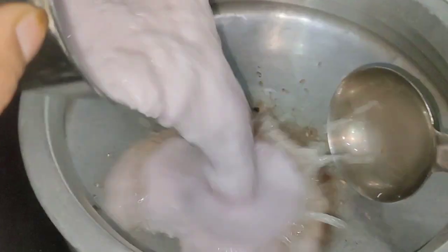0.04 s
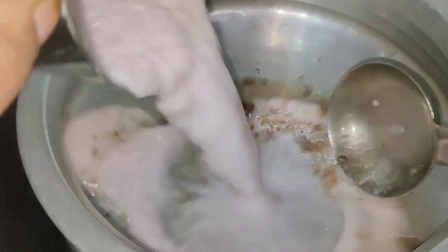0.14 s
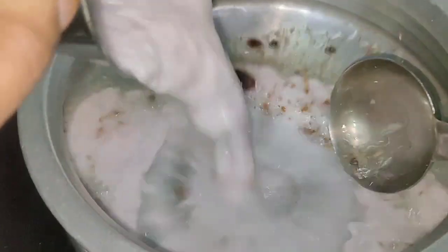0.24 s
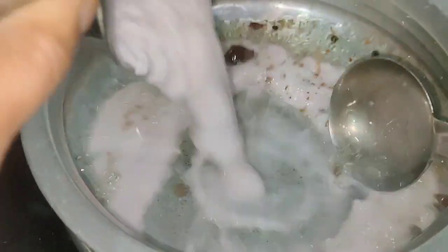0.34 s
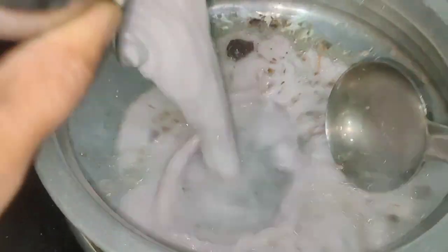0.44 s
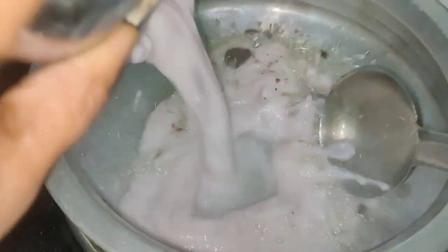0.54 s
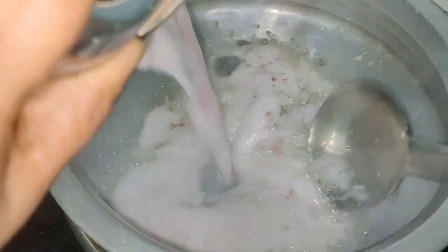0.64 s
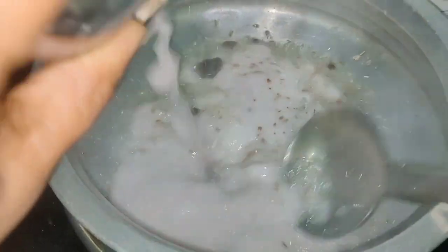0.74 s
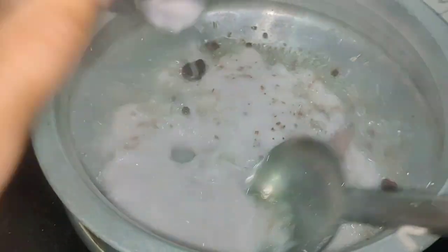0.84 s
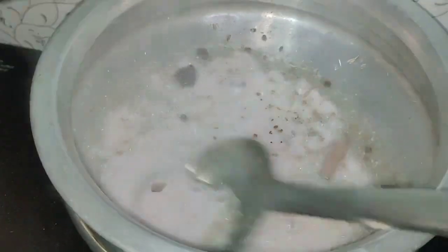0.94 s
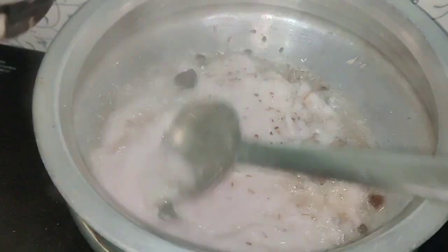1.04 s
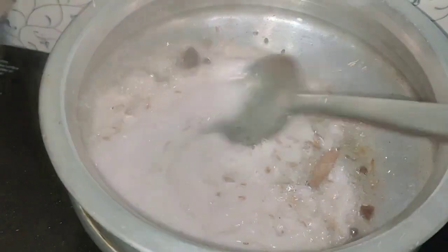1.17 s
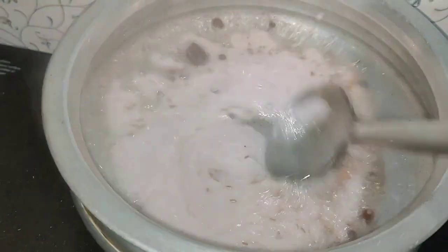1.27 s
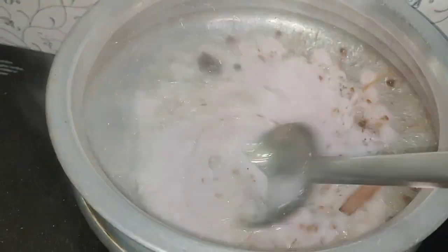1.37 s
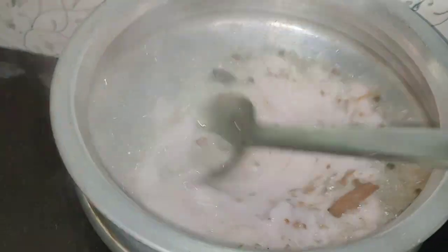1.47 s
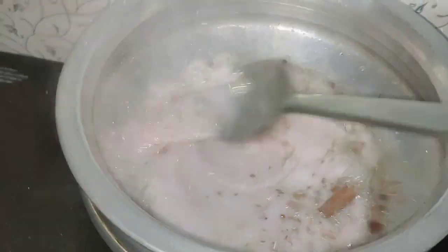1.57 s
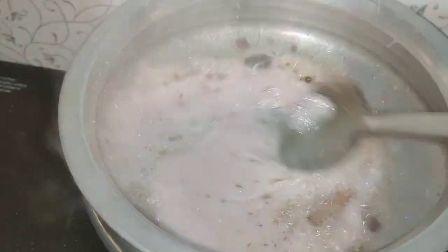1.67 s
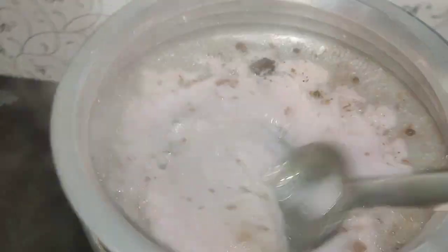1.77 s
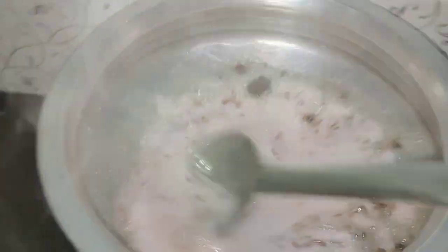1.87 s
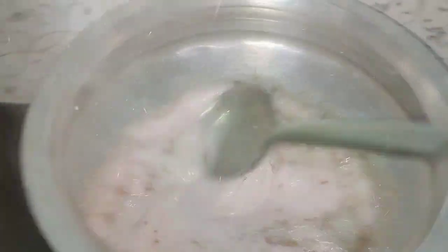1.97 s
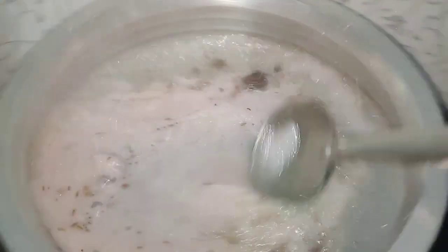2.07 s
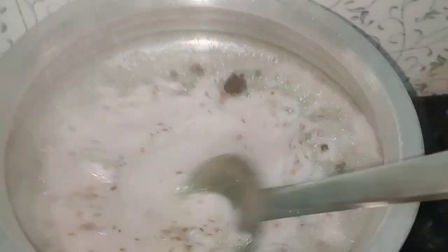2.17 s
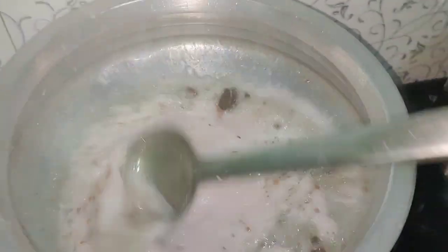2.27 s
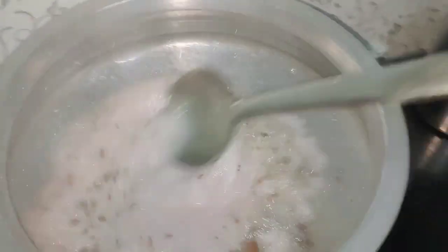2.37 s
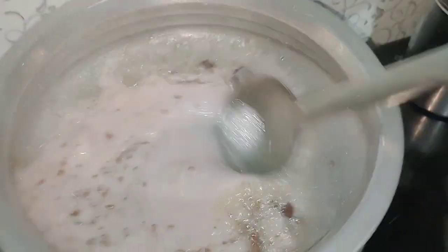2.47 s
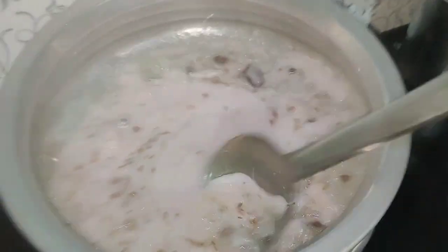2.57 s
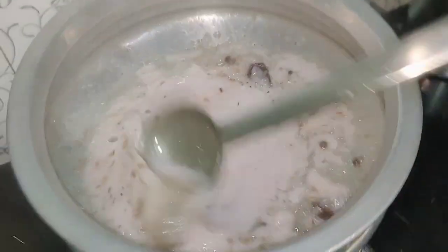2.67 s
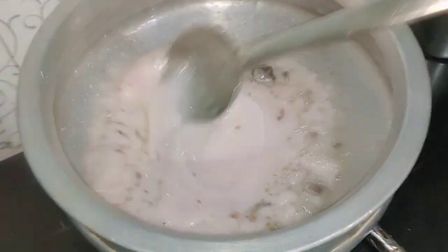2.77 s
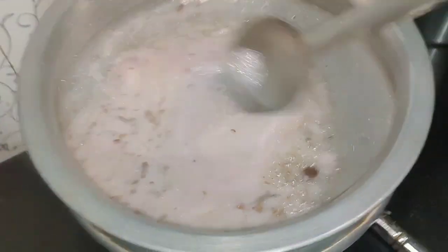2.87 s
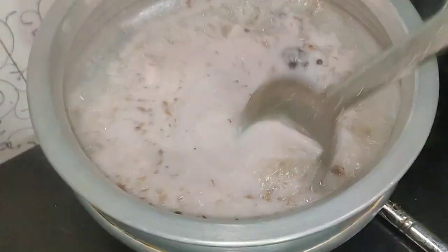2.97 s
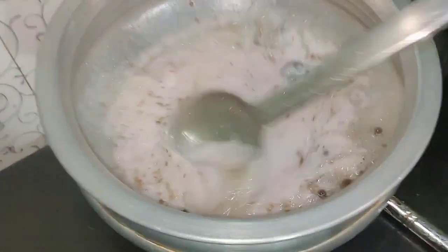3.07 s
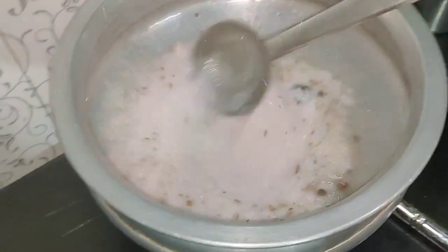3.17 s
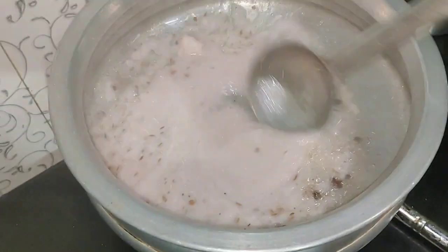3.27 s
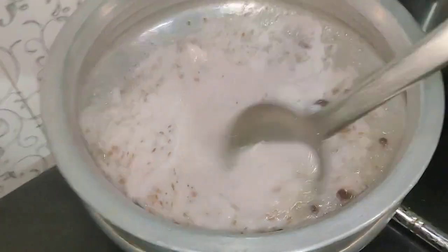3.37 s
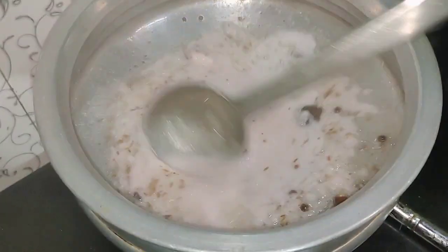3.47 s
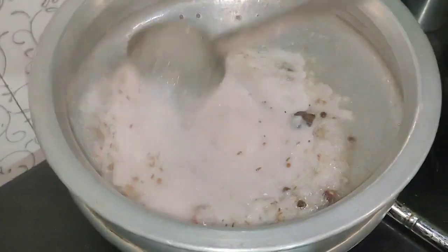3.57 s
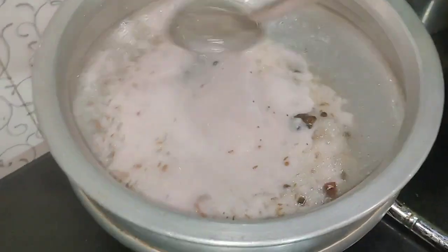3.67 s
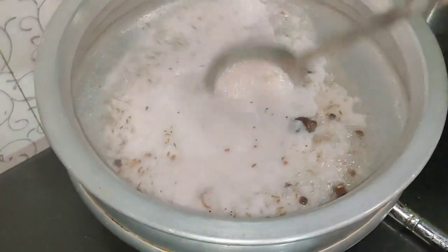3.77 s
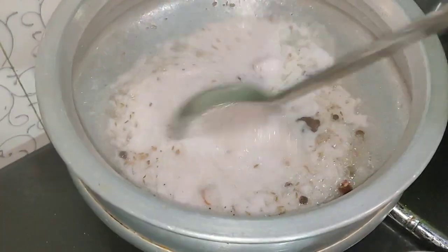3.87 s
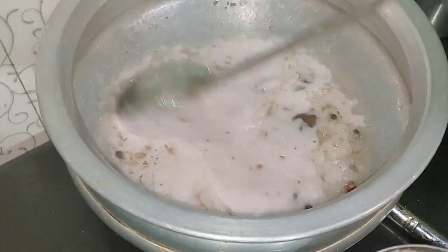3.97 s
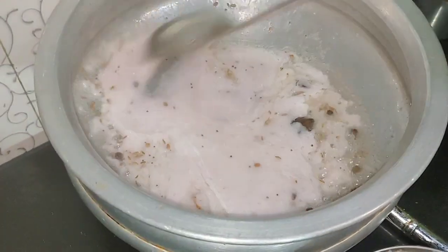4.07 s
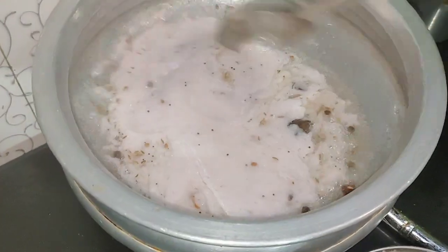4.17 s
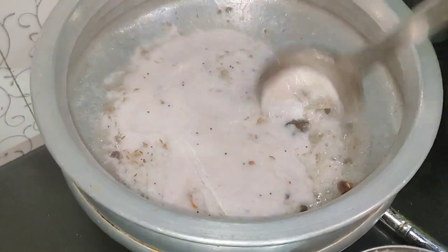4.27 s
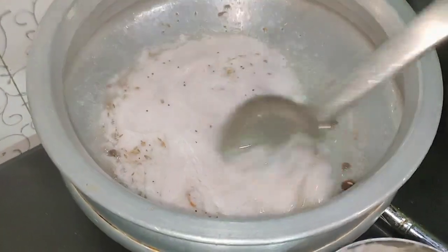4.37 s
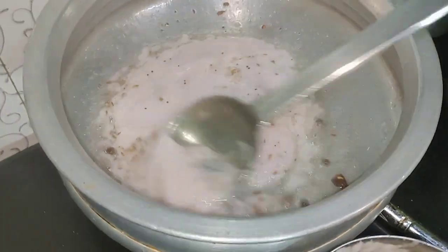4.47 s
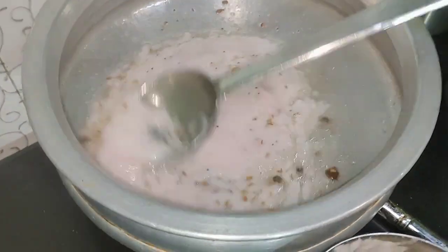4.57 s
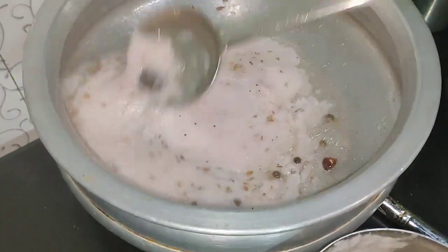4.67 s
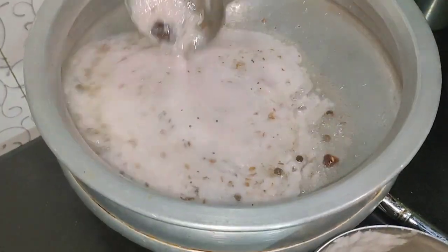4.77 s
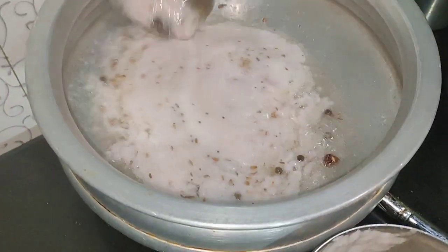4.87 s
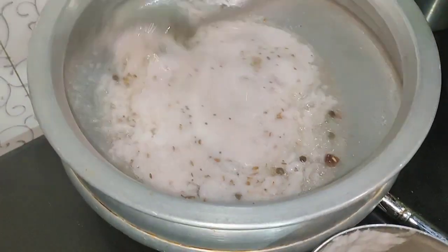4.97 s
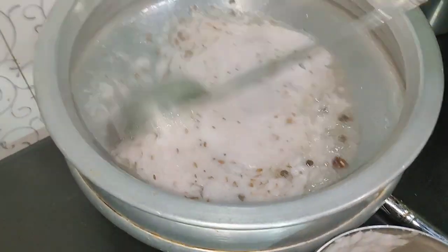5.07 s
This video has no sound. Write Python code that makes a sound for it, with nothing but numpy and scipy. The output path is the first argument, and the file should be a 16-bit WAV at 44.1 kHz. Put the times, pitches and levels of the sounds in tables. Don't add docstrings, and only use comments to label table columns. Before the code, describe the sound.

Close above a metal pot on a gas flame: a brief near-quiet with low flutter, a tiny metallic crack, two dull thuds and a sudden dense frying hiss. Sharp steam spits crowd the first two seconds, with hollow pot resonance beneath. Stirring brings uneven swells, then the sizzle thins, leaving late pops and faint knocks. Indoor phone sound, wide and slightly overloaded at its loudest.

```python
import sys
import numpy as np
from scipy import signal
from scipy.fft import rfft, irfft, next_fast_len
from scipy.io import wavfile

SR = 44100
rng = np.random.default_rng(int(sys.argv[2]) if len(sys.argv) > 2 else 0)


def wrap_up_sound(samples):
    columns = np.atleast_2d(samples).T
    tamed = np.clip(columns, -1, 1)
    steps = np.round(tamed * 32767).astype(np.int16)
    wavfile.write(sys.argv[1], SR, steps)


def magnitude_from_level(level_db):
    exponent = np.asarray(level_db, float) / 20
    return 10 ** exponent


N = 225995

# (time [s], level [dB])
BOIL = [(0, -54), (.17, -58), (.275, -49), (.281, -35), (.315, -32.5), (.323, -27.5), (.39, -24.5),
        (.43, -19), (.535, -18.5), (.58, -17.5), (.78, -20.5), (1.49, -19.5), (1.55, -17.5), (2.15, -18.5),
        (2.75, -21), (3.4, -20), (4.3, -27), (5.12, -30.5)]
# (middle [s], half length [s], swell [dB])
STIRS = [(0.705, 0.032, 2.5), (0.985, 0.07, -0.5), (1.27, .1, 1.5), (1.732, 0.15, 0), (2.0, 0.051, 1),
         (2.154, 0.059, 1), (2.487, 0.14, 2.5), (2.723, .08, 0.5), (2.871, 0.058, 2.5), (3.01, 0.043, -0.5),
         (3.117, .08, 0.5), (3.521, 0.38, -3.5), (3.808, 0.081, 2), (4.153, .1, 0), (4.344, 0.074, 1),
         (4.608, 0.21, 3), (4.814, .1, -3), (4.99, 0.13, 2.5)]
# (time [s], level [dB])
SPLASHES = [
    (.19, -39),
    (.279, -47),
    (0.3181, -33.5),
]
# (frequency [Hz], width [Hz], level [dB])
POT_MODES = [(250, 99, -10.5), (452, 13, -13), (559.55, 3.3, -7), (672, 26, -5.5), (703, 35, -3.5),
             (1115, 44, -0.5), (1223.6, 190, 1), (1280, 120, -5.5), (1663, 60, 0)]
# (time [s], peak [dB], pitch [Hz], left minus right [dB])
POPS = [(0.3202, -13, 3800, 5), (0.7097, -3, 3490, 4.5), (1.0348, -10, 3900, 5.5), (1.6341, -5, 4020, 7),
        (2.201, -8, 3420, 6.5), (2.5063, -6, 3920, -1.5), (2.8501, -11, 3600, 7), (4.2812, -18, 3600, 1.5),
        (4.3068, -13, 3680, 8), (4.361, -11.5, 3600, 6.5), (4.6164, -10, 3190, -2), (4.644, -15, 3980, 2),
        (4.67, -13, 3770, 3)]
# (time [s], peak [dB], pitch [Hz])
GULPS = [
    (1.2022, -13, 1700),
    (1.205, -13, 2050),
    (1.2088, -17, 1800),
    (1.213, -21, 2100),
    (1.472, -19, 2100),
    (1.6696, -13, 2100),
]
# (time [s], peak [dB], pitch [Hz], left minus right [dB])
SPITS = [(0.2164, -32.5, 6830, -7), (0.2823, -21, 7450, -10), (0.2927, -29, 6520, -12),
         (0.3224, -17, 6060, -6), (0.5625, -2.5, 6830, -1), (0.6881, -4, 7100, 0), (0.977, -1, 6090, 4.5),
         (1.034, -0.5, 7410, -10), (1.0465, -3, 6320, -1), (1.092, -5.5, 6280, 7), (1.145, -6.5, 6870, -9),
         (1.1594, -6.5, 7130, -9), (1.1806, -12.5, 6980, -13.5), (1.212, -11.5, 6330, -1),
         (1.4873, -7.5, 6700, -10), (1.604, -10, 5950, 4.5), (1.6164, -4, 5880, -7),
         (1.689, -17, 7060, -3.5), (1.7187, -13, 7060, -1), (2.1174, -4.5, 6500, -7),
         (2.1327, -10.5, 6780, 8.5), (5.0014, -18.5, 6700, -1.5)]
# (time [s], peak [dB], pitch [Hz], t60 [s])
BUMPS = [
    (0.38, -23, 215, 0.07),
    (0.402, -22, 129.8, 0.12),
    (0.751, -23.5, 151, 0.11),
    (3.737, -24, 472.5, 0.0534),
    (4.035, -23, 257.7, 0.094),
    (4.383, -39, 234.7, 0.062),
    (4.699, -24.5, 242.3, 0.09),
    (4.722, -27.5, 272.2, 0.0658),
]
# (time [s], peak [dB])
TICKS = [
    (0.1885, -17.5),
    (0.191, -20),
    (0.191, -18),
    (0.1928, -14.5),
]
# (frequency [Hz], level [dB], t60 [s])
TICK_MODES = [(1750, 1, .03), (2234, -9, .05), (2700, -2, .04), (3400, -7, .025), (5700, -11, .02)]
# (start [s], length [s], level [dB], pitch [Hz])
FLARES = [(0.101, 0.055, -41, 97.83), (0.164, 0.082, -38, 95.2), (0.277, 0.055, -44, 94.5),
          (.327, 0.14, -40.5, 103.9), (.511, 0.097, -40, 95.57), (0.836, 0.217, -38.5, 88.9),
          (1.217, .072, -41, 102.6), (1.288, 0.076, -43.5, 100), (1.371, 0.083, -42.5, 89),
          (1.46, 0.164, -38.5, 96.5), (1.638, .114, -37, 92.8), (1.782, 0.173, -40, 90),
          (2.037, .098, -38.5, 97.1), (2.184, 0.05, -43.5, 102.3), (2.257, 0.074, -40, 92.3),
          (2.332, .094, -41, 93.4), (2.503, 0.069, -48, 99.1), (2.627, 0.11, -38, 90.9),
          (2.799, 0.097, -34.5, 92.3), (2.913, .184, -43, 97.97), (3.122, .072, -39, 94.9),
          (3.205, .144, -39.5, 95.5), (3.354, 0.18, -41.5, 95.6), (3.531, 0.12, -33.5, 93),
          (3.69, 0.087, -37, 97.6), (3.787, .15, -39, 96.65), (3.961, 0.076, -40, 92.3),
          (4.107, 0.348, -37, 91.6), (4.54, 0.19, -39.5, 95.1), (4.898, 0.104, -37.5, 99.7)]
# (frequency [Hz], density [dB per Hz])
ROAR = [(20, -9), (32, -8), (47, -8.5), (62, -14.5), (80, -1.5), (120, -2), (280, -4.5), (330, -7),
        (420, -20), (500, -8.5), (700, -6.5), (800, -8), (950, -33.5), (2000, -28.5)]
# (frequency [Hz], left-right likeness [0-1])
ROAR_SAME = [(60, 1), (200, 0.951), (350, 0.66), (550, 0.8), (900, .4)]
# (frequency [Hz], width [Hz], level [dB])
KITCHEN = [(89.5, 48, 8.5), (138.5, 5.9, 10.5), (197.4, 5.6, 5.5), (240.5, 7.6, 8), (297.6, 9.8, 3.5),
           (499, 13, 6.5)]
# (resonance [Hz], sharpness [Q])
PORTS = [(6100, 5.23), (7000, 7.4)]
# (frequency [Hz], level [dB])
SHADE = [(700, -0.5), (1500, -3), (2700, -1), (4000, -5), (6000, -2), (7400, -1.5), (8200, -8)]
# (frequency [Hz], level [dB])
EDGE = [(7300, -0.5), (7600, 0.5), (7800, -8), (8000, -18), (8200, -47.5), (8400, -65), (8600, -63)]

FIZZ_STIR, RING_STIR = 0.52, 0.41
SPLASH_T60 = 0.28
BODY_DB, BODY_SLOPE, BODY_FROM_S, BODY_IDLE_DB = -31.5, 1.152, 0.33, -51.5
RING_DB, RING_SLOPE, RING_FROM_S, RING_IDLE_DB = -39.5, 0.98, 0.29, -51.5
POUR_DB, POUR_END_S, POUR_FADE_S = 4, 0.864, .04
FLARE_EDGE = 0.34
FLARE_DB, PILOT_DB = 0, -49.5
ROAR_DB = -42


def frying():
    fizz_db, body_db, ring_db = layers()
    surge_db = drift(25)
    fizz = foam(4160, 8340, 30000, 3.04, 4.03, 4.3, 1.0)
    body = foam(1474, 3872, 7000, 1.51, 3.37, 8.6, 0.52)
    crackle = foam(1300, 5000, 700, 1.7, 0.92, 2.3, 1.0, count=4)
    foaming = magnitude_from_level(fizz_db - 7.0 + 0.56 * surge_db) * fizz
    foaming += magnitude_from_level(body_db + 1.8 + 0.44 * surge_db) * body
    foaming += magnitude_from_level(body_db - 4 + 1.5 * surge_db) * crackle
    return foaming, magnitude_from_level(ring_db + 1.5 + .5 * surge_db) * pot_ring()


def layers():
    t = np.arange(N) / SR
    (boil_db,) = curves(BOIL)
    stir_db = sum(db * np.exp(-((t - s) / half) ** 2) for s, half, db in STIRS)
    splash = sum((t > s) * magnitude_from_level(db - 60 * abs(t - s) / SPLASH_T60) for s, db in SPLASHES)
    body = magnitude_from_level(BODY_DB + BODY_SLOPE * (boil_db + 20) + stir_db)
    body *= np.clip((t - BODY_FROM_S) / 0.044, 0, 1)
    pour_db = POUR_DB * (1 - np.tanh((t - POUR_END_S) / POUR_FADE_S)) / 2
    ring = magnitude_from_level(RING_DB + RING_SLOPE * (boil_db + 20.5) + RING_STIR * stir_db + pour_db)
    ring *= np.clip((t - RING_FROM_S) / 0.014, 0, 1)
    body = np.hypot(body + splash, magnitude_from_level(BODY_IDLE_DB))
    ring = np.hypot(ring, magnitude_from_level(RING_IDLE_DB))
    return boil_db + FIZZ_STIR * stir_db, 20 * np.log10(body), 20 * np.log10(ring)


def foam(lo_hz, hi_hz, per_s, spread_db, cycles, slope_db, patchy_db, count=12):
    out = np.zeros((2, N))
    for hz in np.geomspace(lo_hz, hi_hz, count):
        shape = bubble(hz, cycles, rise=0.032)
        shape = shape / np.linalg.norm(shape) * magnitude_from_level(slope_db * np.log2(hz / lo_hz))
        train = bursts(per_s / count, spread_db, 9, lag_spread=5) * magnitude_from_level(patchy_db * drift(23.0))
        out += signal.oaconvolve(train, shape[None], axes=1)[:, :N]
    return evened(out)


def bubble(hz, cycles, rise):
    turns = np.arange(int(5 * cycles * SR / hz) + 8) * hz / SR
    tone = np.sin(2 * np.pi * turns * (1 + rise * turns / cycles))
    return tone * np.exp(-turns / cycles) * (1 - np.exp(-turns / 0.75))


def bursts(per_s, spread_db, lag_samples, lag_spread):
    count = int(per_s * N / SR)
    at, size, place = rng.random(count), rng.exponential(1, count), rng.standard_normal(count)
    right = (at * (N - 64)).astype(int) + 32
    lag = np.round(lag_samples + lag_spread * place).astype(int)
    left = np.clip(right + lag, 0, N - 1)
    size = magnitude_from_level(spread_db * np.minimum(size, 5)) * rng.choice([-1, 1], count)
    return np.array([np.bincount(left, size, N), np.bincount(right, size, N)])


def pot_ring():
    drumming = bursts(4000, 2.0, 6, lag_spread=5)
    t = np.arange(4000) / SR
    ring = np.zeros(len(t))
    for hz, width, db in POT_MODES:
        fade = np.sqrt(width) * np.exp(-np.pi * width * t)
        ring += magnitude_from_level(db) * fade * np.sin(2 * np.pi * hz * t)
    return evened(signal.oaconvolve(drumming, ring[None], axes=1)[:, :N])


def single_events():
    out = np.zeros((2, N))
    for s, db, hz, pan_db in POPS:
        pop = bubble(hz * .88, 4.0, rise=.08)
        add(out, s, magnitude_from_level(db - 5.5) * both_ports(pop, np.clip(pan_db - 1.0, -5, 5)))
    for s, db, hz in GULPS:
        add(out, s, magnitude_from_level(db) * both_ports(bubble(hz, 5.0, rise=.06), lag=17))
    for s, db, hz, pan_db in SPITS:
        add(out, s, magnitude_from_level(db - 10) * both_ports(froth(hz, 7.9, 0.0024), np.clip(pan_db, -8, 8)))
    for s, db, hz, t60 in BUMPS:
        add(out, s, magnitude_from_level(db - 4.5) * bump(hz, t60))
    for s, db in TICKS:
        add(out, s, magnitude_from_level(db - 10.5) * both_ports(tick(), lag=4))
    return out


def froth(hz, cycles, length, count=7):
    out = np.zeros(round(length * SR) + 3000)
    for late, detune in rng.random((count, 2)):
        pitch_hz = hz * (.85 + 0.31 * late + 0.19 * detune)
        add(out, late ** 2 * length, magnitude_from_level(-9 * late) * bubble(pitch_hz, cycles, rise=0.025))
    return out / abs(out).max()


def bump(hz, t60):
    t = np.arange(6000) / SR
    thud = filtered_noise(len(t), 200, 1000)
    ring = np.sin(2 * np.pi * hz * t) + magnitude_from_level(9 - 60 * t / .13) * thud
    return magnitude_from_level(-60 * t / np.clip(t60, .05, .16)) * ring * (1 - np.exp(-t / 0.0023))


def tick():
    t = np.arange(6000) / SR
    ring = np.zeros(len(t))
    for hz, db, t60 in TICK_MODES:
        ring += magnitude_from_level(db - 60 * t / t60) * np.sin(2 * np.pi * hz * rng.uniform(.98, 1.03) * t)
    crack = filtered_noise(len(t), 1400, 5200)
    sound = ring + magnitude_from_level(7 - 60 * t / 0.01) * crack
    return signal.lfilter(*signal.butter(3, 1400, "high", fs=SR), sound)


def both_ports(sound, pan_db=0, lag=9):
    wait = np.zeros(lag)
    pair = np.array([np.r_[wait, sound], np.r_[sound, wait]])
    return pair * magnitude_from_level(np.array([[.5], [-.5]]) * pan_db)


def walls(x, count=14):
    slots, t = np.arange(60, 7000, 20), np.arange(7020) / SR
    fade = magnitude_from_level(-60 * t / .08) + magnitude_from_level(-14 - 60 * t / .25)
    turn = np.arange(N) / SR * 14.0
    out = np.zeros((2, N))
    for k in range(count):
        taps = np.zeros((2, len(t)))
        at = slots + rng.integers(0, 20, (2, len(slots)))
        np.put_along_axis(taps, at, rng.choice([-1., 1.], (2, len(slots))), 1)
        taps = taps * fade / np.linalg.norm(taps[0] * fade)
        away = abs((turn - k + count / 2) % count - count / 2)
        share = np.cos(np.pi / 2 * np.minimum(away, 1))
        out += signal.oaconvolve(x * share, taps, axes=1)[:, :N]
    return out


def burner():
    drone = flares()
    hz = np.fft.rfftfreq(N, 1 / SR)
    a, b = rfft(rng.standard_normal((2, N)))
    colour_db = read(ROAR, hz)
    colour_db += sum(db / (1 + (2 * (hz - f) / width) ** 2) for f, width, db in KITCHEN)
    same = np.clip(read(ROAR_SAME, hz), 0, 1)
    pair = np.array([a, same * a + np.sqrt(1 - same ** 2) * b])
    roar = irfft(pair * magnitude_from_level(colour_db), N)
    return drone + magnitude_from_level(ROAR_DB + 1.5) * evened(roar) * magnitude_from_level(1.1 * drift(6))


def flares():
    start, length, _, pitch_hz = np.transpose(FLARES)
    drone_hz = np.interp(np.arange(N) / SR, start + length / 2, pitch_hz)
    level = np.zeros(N)
    for s, length, db, _ in FLARES:
        swell = signal.windows.tukey(round(length * SR), np.clip(FLARE_EDGE, 0, 1))
        add(level, s, magnitude_from_level(db + FLARE_DB) * swell)
    tone = np.sin(2 * np.pi * np.cumsum(drone_hz + 2.2 * drift(10)) / SR)
    return np.sqrt(2) * np.hypot(level, magnitude_from_level(PILOT_DB)) * tone


def evened(x):
    return x / np.sqrt(np.mean(x ** 2) + 1e-20)


def read(points, hz):
    f, value = np.transpose(points)
    return np.interp(np.log(hz + 1), np.log(f + 1), value)


def curves(rows):
    s, *columns = np.transpose(rows)
    return [np.interp(np.arange(N) / SR, s, c) for c in columns]


def add(mix, s, sound):
    part = mix[..., round(s * SR):][..., :sound.shape[-1]]
    part += sound[..., :part.shape[-1]]


def drift(hz):
    return evened(signal.lfilter(*signal.butter(2, hz, fs=SR), rng.standard_normal(N)))


def filtered_noise(count, lo_hz, hi_hz):
    return signal.lfilter(*signal.butter(2, (lo_hz, hi_hz), "band", fs=SR), rng.standard_normal(count))


def scene():
    foaming, ringing = frying()
    pot = foaming + single_events()
    return pot + magnitude_from_level(-6.0) * walls(pot) + ringing + burner()


def top_cut(x):
    return signal.sosfilt(signal.butter(12, 8740, fs=SR, output="sos"), x)


def record(dry):
    size = next_fast_len(N + 4096)
    hz = np.fft.rfftfreq(size, 1 / SR)
    left, right = (1 / (1 - (hz / port_hz) ** 2 + 1j * hz / (port_hz * sharp)) for port_hz, sharp in PORTS)
    ports = np.array([left, right * magnitude_from_level(read(SHADE, hz))])
    heard = irfft(rfft(dry, size) * ports, size)
    heard = heard / (1 + (heard / .88) ** 6) ** (1 / 6)
    band_limit = magnitude_from_level(np.interp(hz, *np.transpose(EDGE)))
    heard = irfft(rfft(heard) * band_limit, size)[:, :N]
    mix = np.clip(heard, -1, 1)
    return top_cut(mix)


dry = scene()
out = record(dry)
wrap_up_sound(out)
```